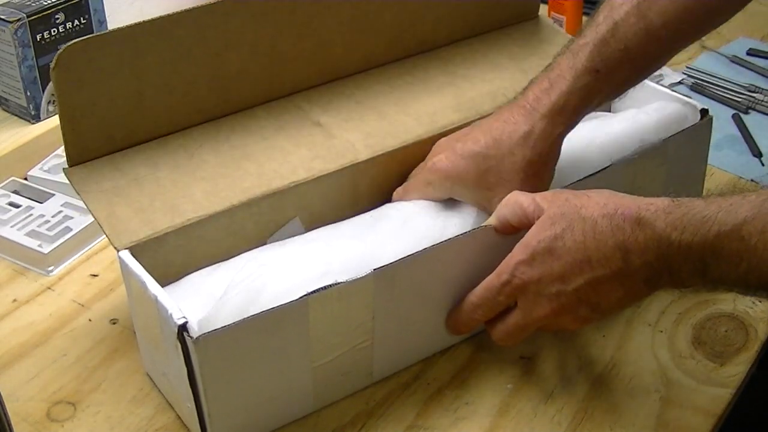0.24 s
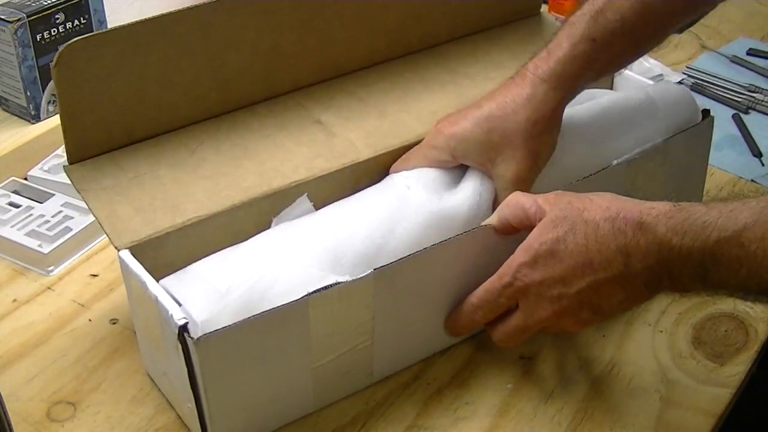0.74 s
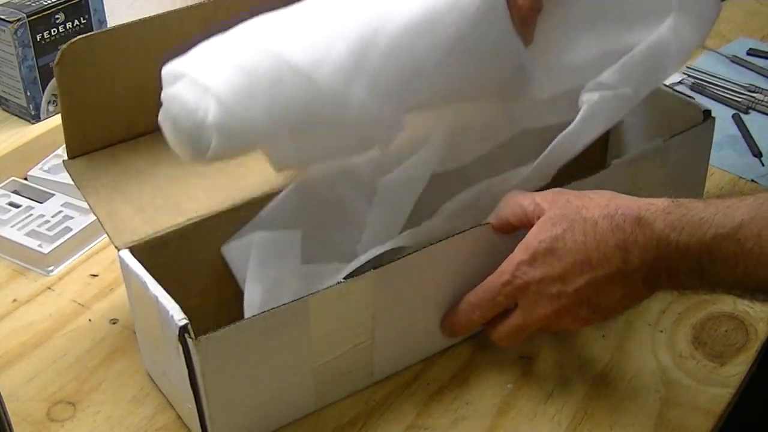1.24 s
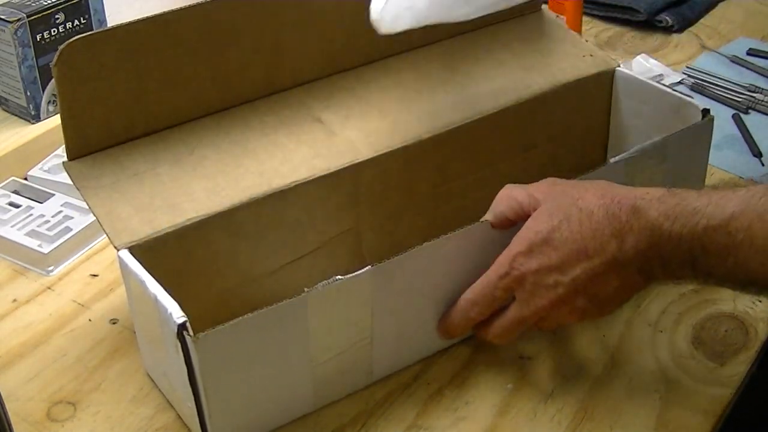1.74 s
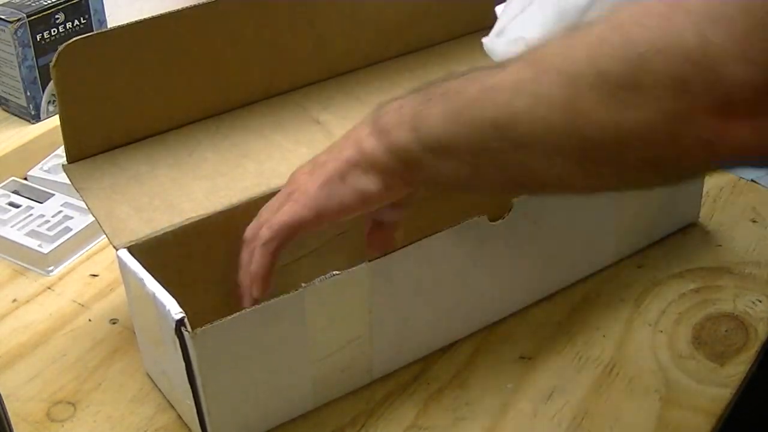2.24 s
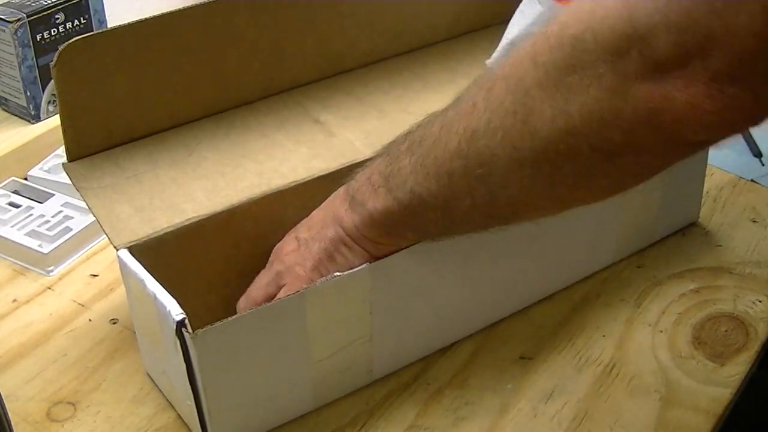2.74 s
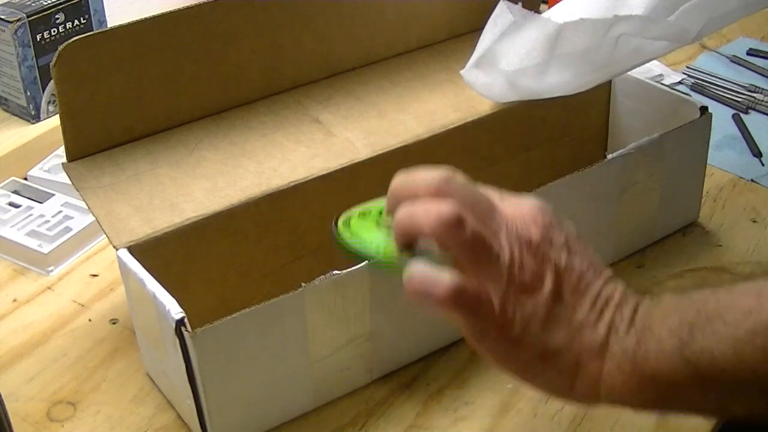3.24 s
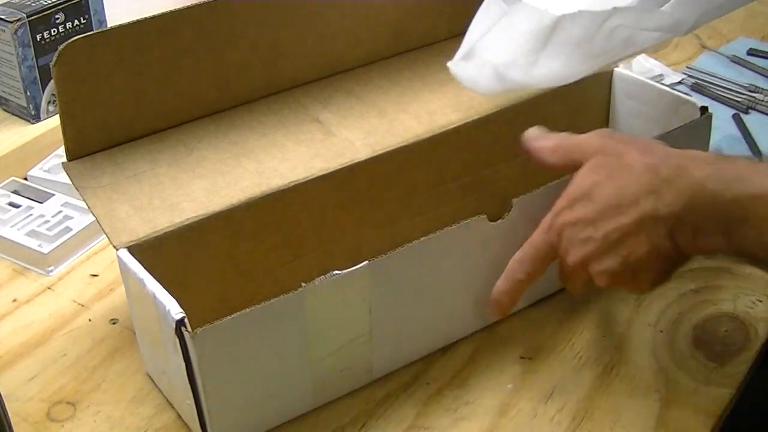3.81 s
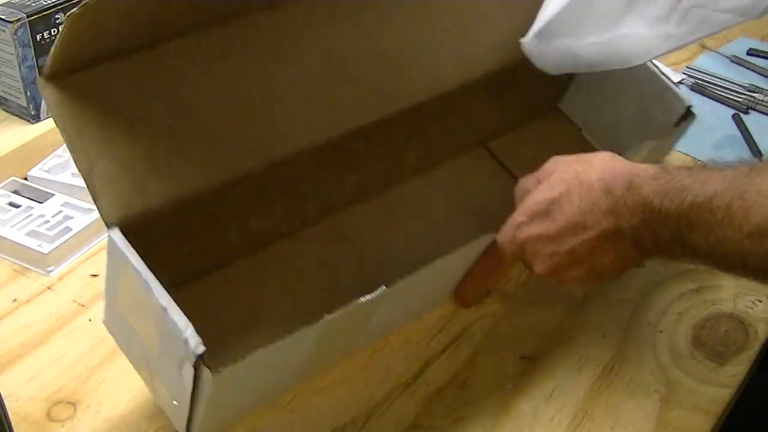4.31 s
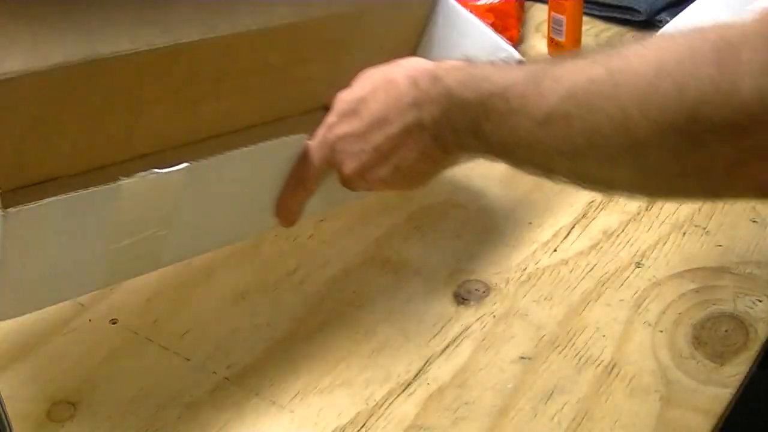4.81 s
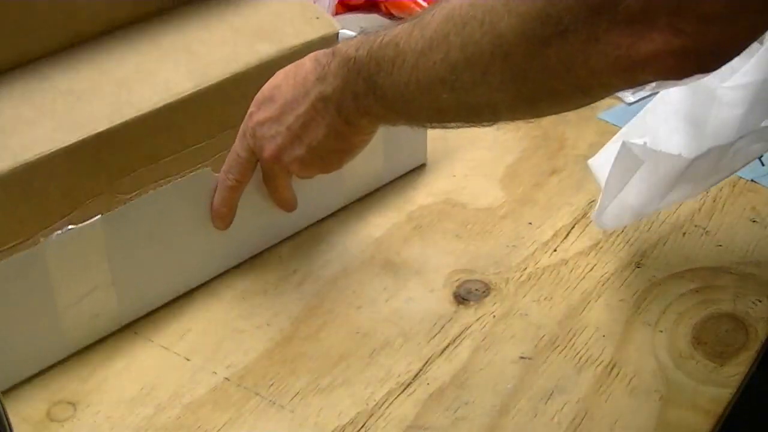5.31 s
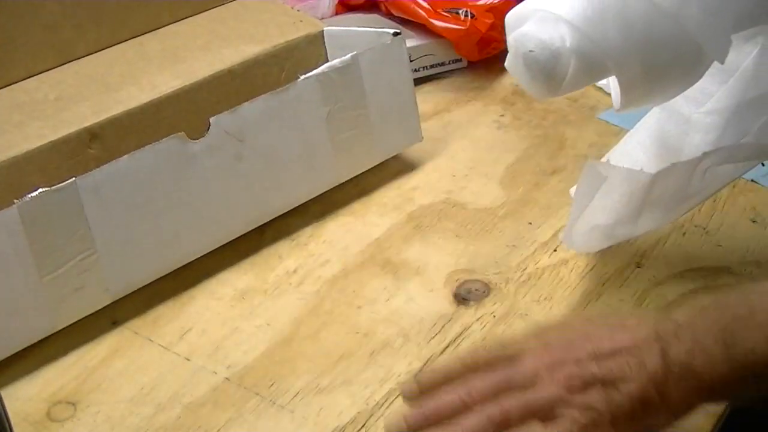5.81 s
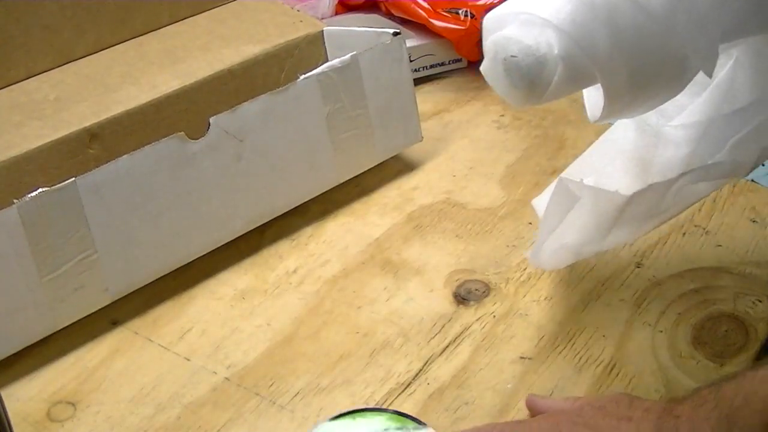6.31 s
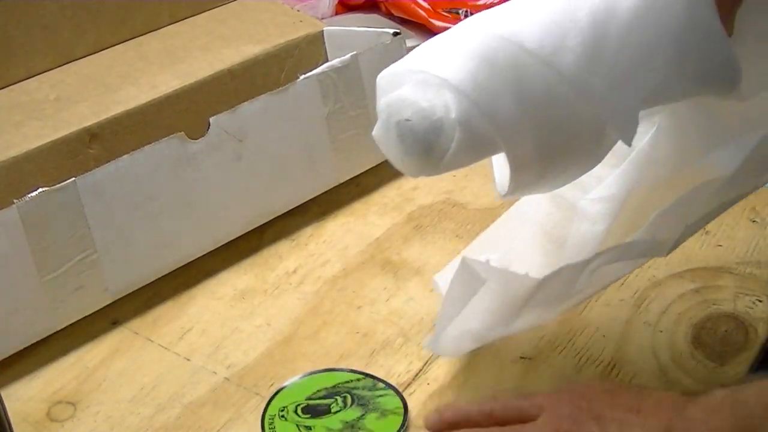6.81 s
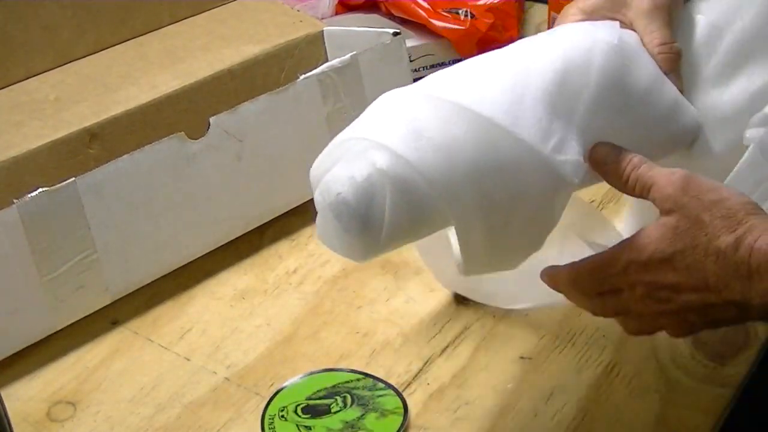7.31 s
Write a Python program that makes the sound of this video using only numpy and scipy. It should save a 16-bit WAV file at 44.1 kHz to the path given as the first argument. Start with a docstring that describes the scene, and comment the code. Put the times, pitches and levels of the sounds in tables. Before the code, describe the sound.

Close unpacking noises in a small workshop: crisp foam rustle, cardboard knocks, wooden thump, scratching, plastic clicks, a hollow box thud, faint fan hum.

```python
"""Unpacking a foam-wrapped barrel

A foam-wrapped barrel is pulled from a long cardboard box and laid on a plywood bench; fingers scrape out a
plastic disc, the box is swung aside and dropped, and the wrap is handled again while a fan motor hums.
Rubbing is built from random tiny slips, knocks and clicks from ringing modes and noise bursts, and the fan
from wavering tones over shaped noise. Echoes add a small workshop; a limiter ducks after the hardest knocks."""
import sys
import numpy as np
from scipy import signal
from scipy.fft import rfft, irfft
from scipy.io import wavfile
from scipy.ndimage import uniform_filter1d, minimum_filter1d

SR = 44100
rng = np.random.default_rng(int(sys.argv[2]) if len(sys.argv) > 2 else 0)


def inscribe(sig):
    """Save sig as 16-bit PCM at rate SR to the path in sys.argv[1].

    A 1-D sig is mono; a 2-D sig holds one channel per row.
    Samples are clipped to [-1, 1] before scaling.
    """
    pcm = np.round(np.clip(np.atleast_2d(sig).T, -1, 1) * 32767)
    wavfile.write(sys.argv[1], SR, pcm.astype(np.int16))


N = 332955
T = np.arange(N) / SR  # time in seconds


# the wrap slides steadily on itself and on the box; levels before the trims in foam_rustle
# columns: start t/s, length/s, foam hiss level/dB, cardboard rasp level/dB
SLIDES = [(.01, 0.099, -36.5, -31), (0.143, 0.3, -38, -28.5), (0.45, 0.23, -43, -40.5),
          (0.831, 0.3, -35.5, -36), (1.138, 0.3, -44.5, -38.5), (1.428, 0.065, -50, -49),
          (1.648, 0.17, -49, -47), (1.8, .16, -55, -49.5), (3.024, 0.4, -58.5, -72), (4.25, 1, -61, -61.5),
          (6.183, 0.32, -43.5, -67), (6.508, 0.084, -48.5, -66), (6.797, 0.15, -63, -52.5),
          (7.036, 0.12, -47.5, -49.5), (7.234, 0.42, -44, -51)]
# a loose fold or a hand brushes past; levels before the same trims
# columns: peak t/s, length/s, foam hiss level/dB, cardboard rasp level/dB
BRUSHES = [(0.565, 0.02, -33.5, -27.5), (0.792, 0.33, -46.5, -38.5), (1.091, 0.16, -33, -41),
           (1.339, 0.28, -35.5, -45), (1.685, 0.1, -42.5, -40.5), (1.953, 0.084, -49.5, -45),
           (2.942, 0.18, -59, -48), (3.251, .11, -51.5, -54), (4.281, 0.085, -55, -46),
           (5.034, 0.064, -54, -46.5), (5.175, 0.096, -50.5, -42.5), (6.014, 0.039, -49, -43.5),
           (6.365, 0.1, -53, -41.5), (6.432, .17, -41.5, -65), (7.188, 0.039, -33.5, -38),
           (7.244, 0.063, -36.5, -35), (7.411, 0.056, -42, -43)]
# loudness of the foam hiss over pitch; columns: f/Hz, level/dB
FOAM_SPECTRUM = [(100, -28), (400, -8), (1500, -3), (3000, -4), (4800, -4.5), (7000, -3), (9000, -1),
                 (11300, -3), (13000, -9), (16000, -14)]


def foam_rustle(hiss_trim_db=-2, rasp_trim_db=-3):
    """Foam cells flick past each other in a fine hiss and drag on the box walls."""
    hiss_power, rasp_power = np.zeros((2, N))
    moves = [(0, slide_pressure(s, length), hiss, rasp) for s, length, hiss, rasp in SLIDES]
    moves += [(s - length / 2, brush_pressure(length), hiss, rasp) for s, length, hiss, rasp in BRUSHES]
    for s, pressure, hiss, rasp in moves:  # overlapping movements add in power
        add(hiss_power, s, (undb(hiss) * pressure) ** 2)
        add(rasp_power, s, (undb(rasp) * pressure) ** 2)
    hiss_gain, rasp_gain = np.sqrt(hiss_power), np.sqrt(rasp_power)

    cell_slips = slips(rate=12000, spread_db=2.5, catch_db=0.5, catch_rate=87)
    cells = unit(colour(cell_slips, FOAM_SPECTRUM), (5000, 15000))
    # a light touch only flicks the cell tips, so it keeps less of the hiss's lower part
    firm_touch_db, light_touch_hz, light_touch_power = -39, 9900, 0.18
    deep = cut(cells, light_touch_hz, "low", order=1)
    firmness = (hiss_gain / undb(firm_touch_db)) ** light_touch_power
    cells = cells + (firmness - 1) * deep

    walls = panel(slips(rate=3500, spread_db=1.0, catch_db=2.05, catch_rate=60), ring_share=0.27)
    # the contact patch wanders, so the lower and upper panel modes take turns
    lower = cut(walls, 1200, "low", order=1)
    sway = undb(2.0 * walk(20))
    walls = unit(lower * sway + (walls - lower) / sway, (1300, 3500))
    hiss = undb(hiss_trim_db) * cells * hiss_gain
    return hiss + undb(rasp_trim_db) * walls * rasp_gain


def slide_pressure(s, length, attack_s=0.039, release_t60_s=0.15):
    """A slide takes hold, stays steady and lets go."""
    t = T - s
    return np.clip(t / attack_s, 0, 1) * fade(np.maximum(t - length, 0), release_t60_s)


def brush_pressure(length, sharpness=1.19):
    """A brush is one smooth swell: half a sine wave raised to a power."""
    angle = np.linspace(0, np.pi, max(int(length * SR), 8))
    return np.abs(np.sin(angle)) ** sharpness


# short strokes of skin, foam or bench on cardboard and wrap
# columns: start t/s, rise/s, fall/s, rasp level/dB, grit level/dB, panel resonance f/Hz
SCRAPES = [(0, 0.036, 0.043, -19.5, -24, 830), (.222, 0.014, 0.11, -26.5, -54, 1570),
           (1.13, 0.0069, 0.021, -25, -44, 1710), (2.455, .024, 0.022, -27, -34.5, 1480),
           (2.481, 0.0089, 0.049, -23, -22.5, 1570), (2.546, 0.0064, 0.087, -28.5, -43, 654),
           (2.601, 0.0043, 0.048, -33, -64, 626), (2.671, 0.0065, .014, -28, -39, 1400),
           (2.694, .034, 0.026, -24, -29, 810), (2.778, .026, 0.027, -37, -33.5, 1660),
           (2.829, .088, 0.02, -33, -33, 960), (3.986, 0.0091, .044, -35.5, -39.5, 1670),
           (4.101, 0.0036, 0.066, -39, -44.5, 1740), (4.131, 0.047, .042, -41.5, -45.5, 1870),
           (5.276, 0.064, 0.095, -32, -35, 750), (5.46, 0.025, 0.044, -28, -38, 613),
           (6.669, 0.012, 0.06, -61.5, -45.5, 3040), (6.992, .006, 0.064, -38, -46, 1350),
           (7.115, 0.019, 0.094, -35, -65, 424)]
# loudness of the fine grit over pitch; columns: f/Hz, level/dB
GRIT_SPECTRUM = [(300, -16), (1500, -6), (3000, 1), (4000, -3), (5200, -7.5), (7200, -2.5), (9500, -1),
                 (11300, -4), (13000, -6), (16000, -16)]


def cardboard_scrapes(edge_db=-12, resonance=0.39, width=1.1):
    """Each stroke swells and lets go, and sings a little in the resonance of the panel under it."""
    rasp = panel(slips(rate=1600, spread_db=2.5, catch_db=-1.0, catch_rate=110), ring_share=0.41)
    grit_slips = slips(rate=7000, spread_db=-3.0, catch_db=1.5, catch_rate=130)
    grit = unit(colour(grit_slips, GRIT_SPECTRUM))
    out, t = np.zeros(N), T[:SR // 4]
    for s, rise, fall, rasp_db, grit_db, panel_hz in SCRAPES:
        # a smaller, stiffer panel rasps in a higher band; these edges are for a 1 kHz panel
        stiffness = (panel_hz / 1000) ** 0.34
        low_hz, bright_hz = 393 * stiffness, 1770 * stiffness
        # a firmer stroke has coarser grit: 5.5 dB more rasp lowers the top edge by an octave
        top_hz = 13600 * 2 ** (-(rasp_db + 30) / 5.5)
        start = max(int(s * SR), 0)
        part = slice(start, start + len(t))
        corners = np.cumsum([0, .004, rise, fall, .02])
        pressure = undb(np.interp(t, corners, [-50, edge_db, 0, edge_db, -90]))
        body = unit(cut(cut(rasp[part], bright_hz, "low"), low_hz, "high"))
        squeak = unit(cut(rasp[part], (panel_hz / width, panel_hz * width), "bandpass", order=1))
        sand = cut(grit[part], top_hz, "low")
        stroke = undb(rasp_db) * unit(body + resonance * squeak) + undb(grit_db) * sand
        add(out, s, pressure * stroke)
    return out


# ringing modes of the cardboard box, also used for its knocks; columns: f/Hz, level/dB, t60/s
BOX_MODES = [(115.4, -7.5, 0.51), (161, -4, 0.21), (221.6, 2.5, 0.086), (243, -6, 0.067), (314, 0, 0.08),
             (356, 0.5, 0.044), (484, 6.5, 0.057), (565, -2, 0.07), (632, -1.5, 0.058), (794, 4.5, 0.031),
             (913, 3.5, 0.032), (1300, -18.5, 0.034), (1626, 4.5, 0.02), (1920, -2.5, 0.0077),
             (2086, 9.5, 0.019), (2284, 10.5, 0.028), (3160, 7, 0.0063)]
# loudness of the cardboard over pitch; columns: f/Hz, level/dB
BOARD_SPECTRUM = [(80, -6.5), (170, -4.5), (330, 0), (700, 4.5), (1150, 0.5), (1700, 5), (2500, -5),
                  (3300, -1.5), (4200, -13.5), (8000, -26), (16000, -49)]


def panel(force, ring_share):
    """A cardboard panel radiates the slips directly and through its modes."""
    modes = ring(BOX_MODES)
    rung = signal.fftconvolve(force, modes / np.sqrt(np.sum(modes ** 2)))[:N]
    return colour(force + ring_share * rung, BOARD_SPECTRUM)


def slips(rate, spread_db, catch_db, catch_rate):
    """Friction: tiny slips of uneven size that bunch as the surface catches and lets go."""
    size = undb(spread_db * np.minimum(rng.exponential(size=N), 3)) * rng.uniform(-0.95, 1, N)
    happens = rng.random(N) < rate / SR  # rate is in slips per second
    return unit(happens * size * undb(catch_db * walk(catch_rate)))


# fingertips squeak on the cardboard; columns: start t/s, length/s, level/dB, f/Hz
SQUEAKS = [(2.505, 0.015, -26, 1650), (2.706, 0.022, -29, 690), (4.003, 0.049, -44, 1810),
           (4.102, .03, -36, 1787), (4.14, 0.045, -43, 1830)]


def finger_squeaks(waver=0.011, rough_db=2.5):
    """Skin sticks and slips in step with one panel resonance for a moment."""
    out, drift, grip = np.zeros(N), walk(350), undb(rough_db * walk(250))
    for s, length, db, hz in SQUEAKS:
        window = np.hanning(max(int(length * SR), 8))
        part = slice(int(s * SR), int(s * SR) + len(window))
        phase = 2 * np.pi * np.cumsum(hz * (1 + waver * drift[part])) / SR
        add(out, s, undb(db) * np.sqrt(2 * window) * grip[part] * np.sin(phase))
    return out


# the box is bumped or lands; crack level is relative to the blow
# columns: t/s, level/dB, contact corner f/Hz, flexing f/Hz, crack level/dB
BOX_KNOCKS = [(.001, -20, 610, 323, -17), (.019, -20, 590, 336, -22), (.044, -18.5, 1220, 207, -11),
              (.2238, -18, 1390, 463, -32), (.448, -39, 450, 243, -18), (.4718, -12, 1030, 314, -21.5),
              (.486, -25, 400, 230, -25), (1.003, -32, 2500, 2170, -16), (1.061, -24, 450, 350, -25),
              (1.142, -24.5, 1200, 435, -14), (1.324, -30, 910, 547, -25), (2.019, -43.5, 1500, 1130, -15),
              (2.4172, -38.5, 2000, 890, -6), (2.4215, -25.5, 2200, 496, -30),
              (2.5457, -22, 2060, 760, -10.5), (2.6035, -32, 1200, 650, -27),
              (2.7005, -25.5, 1520, 596, -10.5), (4.008, -29, 1000, 680, -13),
              (4.478, -45.5, 2200, 290, -11), (5.3645, -15.5, 1030, 425, -22),
              (5.3845, -22, 2570, 616, -25), (5.3875, -5, 627, 565, -30), (5.39, -7, 250, 218, -35),
              (5.399, -22, 160, 120, -40), (5.406, -16.5, 1370, 655, -22), (5.4305, -10.5, 670, 390, -32),
              (5.495, -22, 700, 516, -17), (6.993, -33, 2440, 1320, -11)]


def box_knocks():
    """Blows on slack cardboard flex it strongly and leave a long flutter."""
    return knocks(BOX_KNOCKS, BOX_MODES, flex=5.4, flex_t60=0.036,
                  rattle=7.1, rattle_t60=0.13, crack_t60=0.035)


# the wrapped barrel meets the bench and rocks once; crack level is relative to the blow
# columns: t/s, level/dB, contact corner f/Hz, flexing f/Hz, crack level/dB
BENCH_KNOCKS = [(1.5693, -4, 1180, 700, -31), (1.6092, -16.5, 1955, 1770, -25)]
# ringing modes of the plywood bench; columns: f/Hz, level/dB, t60/s
BENCH_MODES = [(161, 7, 0.27), (227, 5, 0.09), (308, 6, 0.036), (370, 22, 0.021), (468, 16, 0.06),
               (558, 1.5, 0.34), (658, 20, 0.046), (778, -28, 0.18), (870.5, 3, 0.35), (1030, -14, 0.26),
               (1206, 4.5, 0.1), (1640, -7, 0.059), (3500, -20, .04)]


def bench_knocks():
    """Blows on the plywood ring its modes with a shorter flutter than the box."""
    return knocks(BENCH_KNOCKS, BENCH_MODES, flex=3.3, flex_t60=0.05,
                  rattle=5.4, rattle_t60=0.046, crack_t60=0.021)


def knocks(rows, modes, flex, flex_t60, rattle, rattle_t60, crack_t60):
    """A blow flexes the panel for a few cycles, rings its modes and flutters; soft contact dulls it."""
    out, t = np.zeros(N), T[:SR // 3]
    for s, db, contact_hz, flex_hz, crack_db in rows:
        # a harder blow on a slacker panel reaches deeper: an octave for each 27.5 dB
        low_hz = 118 * (flex_hz / 400) ** 0.51 * 2 ** (-db / 27.5)
        flutter, crack = rng.standard_normal((2, len(t)))
        body = ring(modes) + rattle * flutter * fade(t, rattle_t60)
        body = body + flex * np.cos(2 * np.pi * flex_hz * t) * fade(t, flex_t60)
        body = blow(cut(cut(body, contact_hz, "low"), low_hz, "high", order=4))
        # cardboard and wood crack with a soft top
        crack = cut(crack * fade(t, crack_t60), 1160, "high")
        crack = blow(cut(crack, 10000, "low", order=1))
        add(out, s, undb(db) * (body + undb(crack_db) * crack))
    return out


def blow(x):
    """Scale to rms 1 over the first 8 ms."""
    return x / np.sqrt(np.mean(x[:SR // 125] ** 2))


# creases snap in the foam; columns: t/s, peak level/dB, f/Hz, t60/s
SNAPS = [(0.167, -26, 9000, 0.023), (0.191, -23, 11000, .06), (0.3947, -17, 8000, 0.0077),
         (0.4478, -13, 7900, 0.027), (6.005, -25, 7960, 0.009), (6.0112, -21, 8400, 0.019),
         (6.7021, -23, 8700, 0.078), (6.745, -30, 8600, 0.048), (6.766, -31, 8340, 0.078),
         (7.167, -28, 9000, .04), (7.175, -33, 9000, .04), (7.188, -28, 9000, 0.039),
         (7.2292, -17.5, 8340, 0.061), (7.262, -24, 8040, 0.058)]


def foam_snaps(width=1.23):
    """A crease buckles in a quick burst of tiny cracks, made of band-limited noise."""
    out, t = np.zeros(N), T[:SR // 8]
    for s, db, hz, t60 in SNAPS:
        burst = rng.standard_normal(len(t)) * fade(t, t60) * (1 - fade(t, 0.0011))
        add(out, s, undb(db) * peak(cut(burst, (hz / width, hz * width), "bandpass", order=1)))
    return out


# the plastic disc is put down, rim first; columns: t/s, peak level/dB, contact corner f/Hz
DISC_TAPS = [(3.482, -37, 9000), (3.49, -28.5, 1200), (3.5176, -15, 4000), (3.5433, -16, 15000)]
# ringing modes of the disc; columns: f/Hz, level/dB, t60/s
DISC_MODES = [(616, -15, 0.055), (880, -19, 0.045), (1300, -5, 0.046), (1680, -0.5, 0.031),
              (3480, -10, .025), (7270, 10.5, 0.0055), (8540, 14.5, 0.0033), (10400, 13, .004)]


def disc_taps(tick=2.4, plywood=1.0, plywood_t60=0.21):
    """Thin plastic clicks; the plywood under the disc shivers a little longer."""
    out, t = np.zeros(N), T[:SR // 3]
    for s, db, contact_hz in DISC_TAPS:
        snap, shiver = rng.standard_normal((2, len(t)))
        click = ring(DISC_MODES) + tick * snap * fade(t, 0.022)
        click = click + plywood * cut(shiver, 2600, "low") * fade(t, plywood_t60)
        add(out, s, undb(db) * peak(cut(cut(click, contact_hz, "low", order=1), 410, "high")))
    return out


# steady tones of the fan motor; columns: f/Hz, level/dB
HUM = [(118.4, -54.5), (174.8, -47.5), (232.7, -58), (290.7, -60), (349.9, -70.5), (407.8, -54), (468, -76),
       (523, -61), (987, -62.5)]
# loudness of the rush of air over pitch; columns: f/Hz, level/dB
AIR_SPECTRUM = [(30, -30), (68, -15.5), (102, -6.5), (140, -14.5), (200, -12), (320, -13), (526, -14.5),
                (700, -17), (988, -15.5), (1810, -24.5), (3400, -22.5), (4300, -30), (11400, -41),
                (16000, -48)]


def fan(air_db=-50.5):
    """Motor tones waver in phase over a rush of air that drifts slightly in level."""
    hum = sum(undb(db) * np.sin(2 * np.pi * hz * T + 0.14 * walk(1.87)) for hz, db in HUM)
    air = unit(colour(stereo_noise(N), AIR_SPECTRUM), (500, 4000))
    return hum + air * undb(air_db + .5 * walk(3.2))


def workshop(x, near_db, wet_db, count):
    """The point of contact keeps moving, so the sound drifts between the echoes of several spots."""
    shares = np.array([walk(14) for _ in range(count)])
    shares /= np.sqrt(np.sum(shares ** 2, axis=0))  # total power stays even
    out = x
    for share in shares:
        out = out + signal.oaconvolve((share * x)[None], echoes(near_db, wet_db), axes=1)[:, :N]
    return out


def echoes(near_db, wet_db, low_t60=0.35, mid_t60=0.52, high_t60=0.36):
    """From one spot: bench and box scatter the sound at once, shelves and walls add a short tail."""
    t = T[:SR // 2]
    noise = stereo_noise(len(t))
    low, high = cut(noise, 280, "low"), cut(noise, 3800, "high")
    mid = cut(cut(noise, 334, "high"), 4300, "low")
    tail = low * fade(t, low_t60) - mid * fade(t, mid_t60) + high * fade(t, high_t60)
    tail = tail * np.clip((t - .004) / 0.0036, 0, 1)
    near = cut(stereo_noise(len(t)), 580, "high", order=1) * fade(t, 0.026) * (t > .0006)
    return sum(undb(db) * part / np.sqrt(np.sum(part ** 2) / 2)
               for db, part in [(near_db, near), (wet_db, tail)])


# how alike the two channels are; columns: f/Hz, likeness (0-1)
LIKENESS = [(100, 0.84), (300, 0), (700, 0), (2000, 0.03), (5000, 0), (14000, 0.2)]


def stereo_noise(n):
    """Two noises, alike in the deep bass and mostly unrelated above."""
    mid, side = rfft(rng.standard_normal((2, n)))
    alike = along(LIKENESS, n)
    signs = np.array([[1], [-1]])
    return irfft(mid * np.sqrt((1 + alike) / 2) + side * np.sqrt((1 - alike) / 2) * signs, n)


def walk(rate):
    """Random levels held 1 / rate s and smoothed twice; spread near 1."""
    k = max(int(SR / rate), 1)
    steps = np.repeat(rng.standard_normal(N // k + 1), k)
    return 1.28 * uniform_filter1d(uniform_filter1d(steps, k), k)[:N]


def ring(modes):
    """Impulse response of a set of damped modes."""
    t = T[:SR // 3]
    return sum(undb(db) * fade(t, t60) * np.cos(2 * np.pi * hz * t) for hz, db, t60 in modes)


def fade(t, t60):
    """Exponential decay, down 60 dB after t60 seconds."""
    return np.exp(-np.log(1000) * t / t60)


def undb(db):
    """Decibels to gain."""
    return 10 ** (np.asarray(db) / 20)


def along(points, n):
    """A (f/Hz, value) table read at the bins of an n-sample spectrum."""
    hz, value = np.transpose(points)
    return np.interp(np.log(np.arange(n // 2 + 1) * SR / n + 1), np.log(hz), value)


def colour(x, points):
    """Shape a sound with a (f/Hz, level/dB) table."""
    n = x.shape[-1]
    return irfft(rfft(x) * undb(along(points, n)), n)


def cut(x, hz, kind, order=2):
    """Butterworth filter."""
    edges = np.clip(hz, 10, .45 * SR)
    return signal.sosfilt(signal.butter(order, edges, kind, fs=SR, output="sos"), x)


def unit(x, band=None):
    """Scale to rms 1, in one band if given."""
    heard = x if band is None else cut(x, band, "bandpass", order=4)
    return x / np.sqrt(np.mean(heard ** 2))


def peak(x):
    """Scale to peak 1."""
    return x / np.abs(x).max()


def add(out, s, x):
    """Mix a short sound in at s seconds."""
    start = max(int(s * SR), 0)
    out[start:start + len(x)] += x[:N - start]


def scene():
    """Everything on the bench sounds into the same small room, over the fan."""
    rubbing = foam_rustle() + cardboard_scrapes() + finger_squeaks()
    rubbing = workshop(rubbing, near_db=-0.5, wet_db=-6.0, count=8)
    blows = workshop(box_knocks() + bench_knocks(), near_db=-3.0, wet_db=-6, count=4)
    clicks = workshop(foam_snaps() + disc_taps(), near_db=-8.0, wet_db=-8.5, count=3)
    return rubbing + blows + clicks + fan()


def maximum_ahead(db):
    """Start each gain reduction smoothly, just before its peak."""
    return uniform_filter1d(-minimum_filter1d(-db, size=64), size=64)


# microphone balance; columns: f/Hz, left minus right level/dB
BALANCE = [(60, -7), (250, -6.5), (500, -3), (1000, -2.5), (2000, 0.4), (5000, -1.7), (14000, -1)]


def record(dry, lag_ms=0.015):
    """The right microphone hears more bass, a moment later; a limiter catches peaks and recovers slowly."""
    ceiling_db, release_db_per_s, top_hz = -.5, 4, 16000
    left_tilt = [(hz, db / 2) for hz, db in BALANCE]
    right_tilt = [(hz, -db / 2) for hz, db in BALANCE]
    bins_hz = np.arange(N // 2 + 1) * SR / N
    late = irfft(rfft(dry[1]) * np.exp(-2j * np.pi * bins_hz * lag_ms / 1000), N)
    x = np.array([colour(dry[0], left_tilt), colour(late, right_tilt)])
    level_db = 20 * np.log10(np.abs(x).max(axis=0) + 1e-9)
    over_db = np.maximum(level_db - ceiling_db, 0)
    # hold the largest excess while it falls at the release rate
    duck_db = np.maximum.accumulate(over_db + release_db_per_s * T) - release_db_per_s * T
    x = x * undb(-maximum_ahead(duck_db))
    return signal.sosfilt(signal.ellip(10, .2, 80, top_hz, fs=SR, output="sos"), x)


dry = scene()
out = record(dry)
inscribe(out)
```